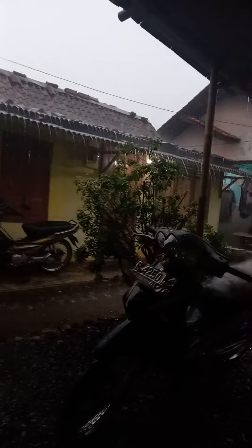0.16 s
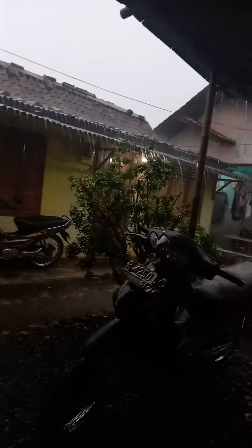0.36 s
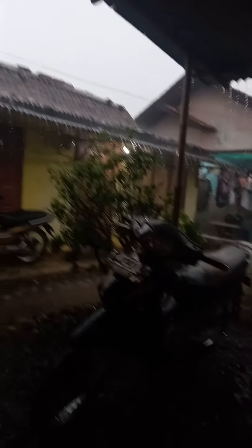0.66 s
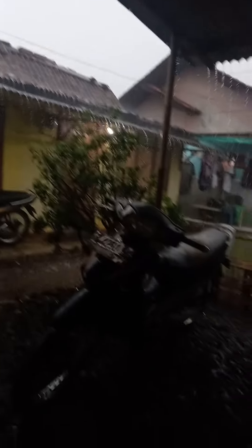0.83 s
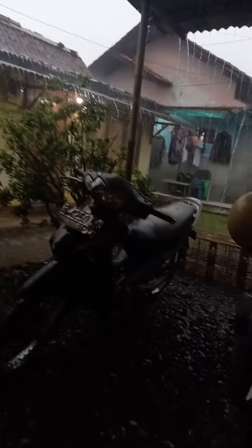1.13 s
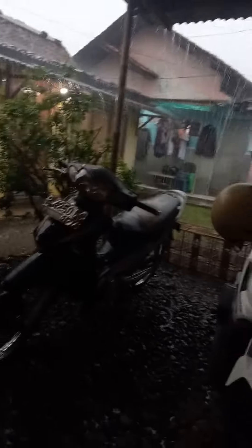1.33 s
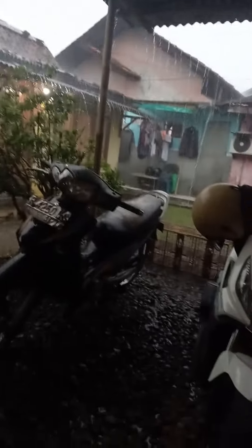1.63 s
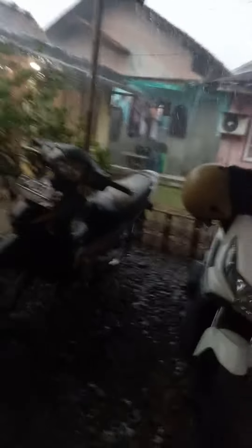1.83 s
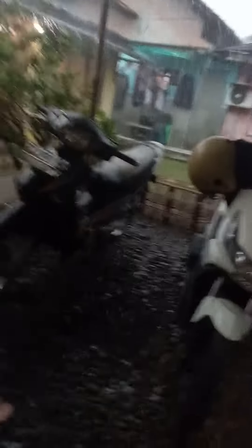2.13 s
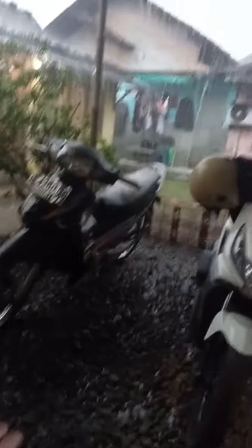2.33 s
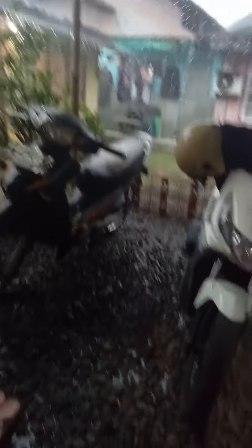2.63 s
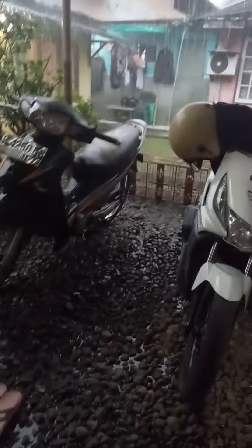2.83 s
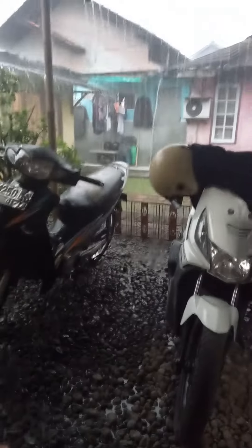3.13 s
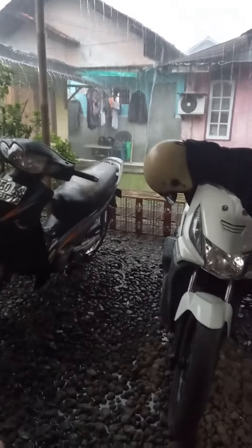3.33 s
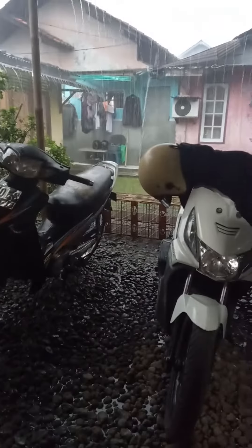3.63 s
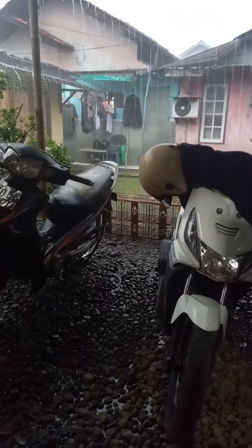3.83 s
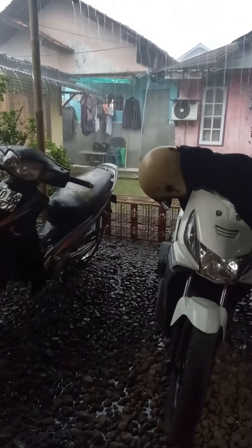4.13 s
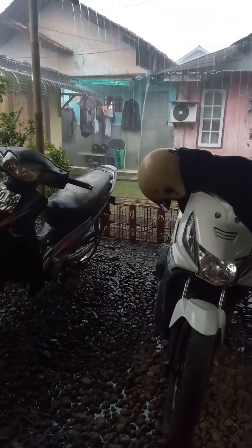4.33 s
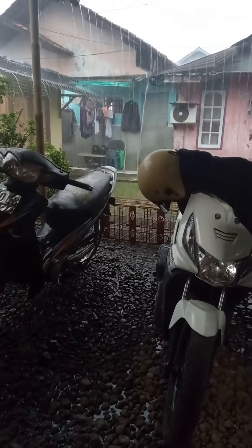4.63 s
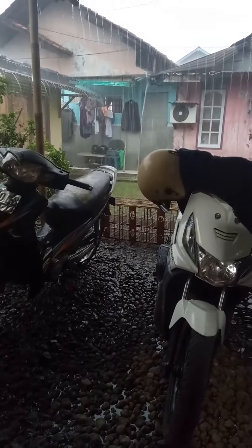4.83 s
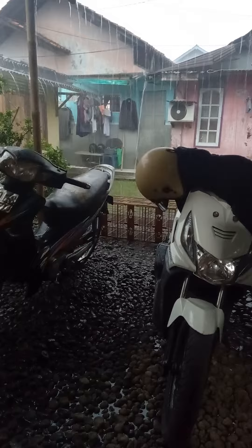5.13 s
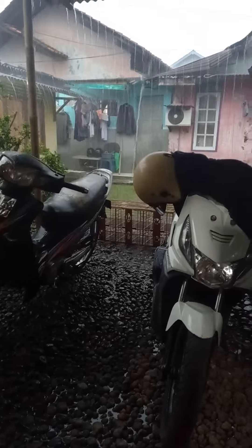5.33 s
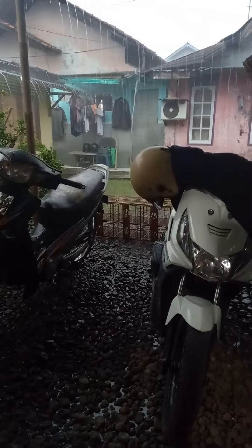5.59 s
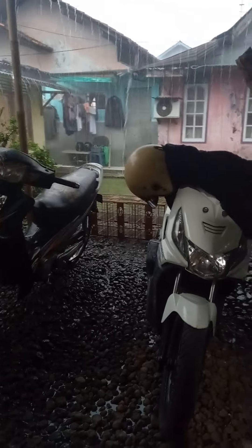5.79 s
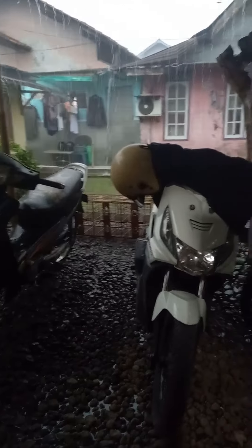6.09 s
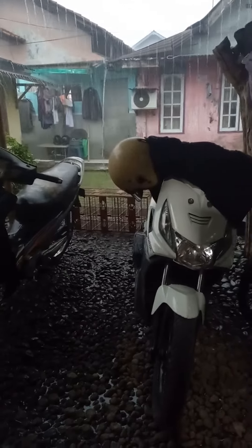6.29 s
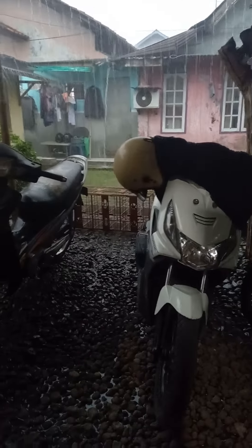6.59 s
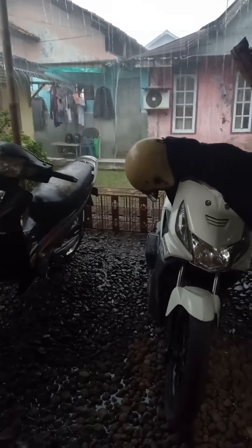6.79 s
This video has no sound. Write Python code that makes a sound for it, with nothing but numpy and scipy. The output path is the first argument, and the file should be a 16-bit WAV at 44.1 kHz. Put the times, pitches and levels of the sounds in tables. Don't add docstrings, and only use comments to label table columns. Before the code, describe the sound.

Heavy rain roars on a gravel yard and drums on a metal roof; distant thunder mutters, then a near strike cracks and rolls on.

```python
import sys
import numpy as np
from scipy import signal
from scipy.fft import rfft, irfft, next_fast_len
from scipy.io import wavfile
from scipy.ndimage import uniform_filter1d, minimum_filter1d, map_coordinates

SR = 44100
rng = np.random.default_rng(int(sys.argv[2]) if len(sys.argv) > 2 else 0)


def level_to_linear(level):
    exponent = np.asarray(level, float) / 20
    return 10 ** exponent


def file_out(sig):
    cols = np.atleast_2d(sig).T
    lim = np.clip(cols, -1, 1)
    pcm = np.round(lim * 32767).astype(np.int16)
    wavfile.write(sys.argv[1], SR, pcm)


N = 306495


def unit(x):
    return x / np.sqrt(np.mean(x ** 2) + 1e-20)


def along(points, hz):
    f, v = np.transpose(points)
    return np.interp(np.log(hz + 1), np.log(f + 1), v)


def curves(rows):
    s, *cols = np.transpose(rows)
    return [np.interp(np.arange(N) / SR, s, c) for c in cols]


def wobble(rate):
    knots = rng.standard_normal(int(N * rate / SR) + 4)
    return map_coordinates(knots, [np.arange(N) * rate / SR])


def filtered(x, response):
    m = next_fast_len(N + 8192)
    return irfft(rfft(x, m) * response(np.fft.rfftfreq(m, 1 / SR)), m)[..., :N]


# frequency in Hz, likeness from 0 to 1.
RAIN_LIKENESS = [(60, 0.94), (200, 0.96), (350, .8), (550, 0.57), (750, 0.35), (1000, 0.078), (1400, 0.31),
                 (1750, 0.84), (2000, 0.064), (4000, 0.04), (8000, .02)]
# frequency in Hz, lead of the left in radians.
LEFT_LEAD = [(200, 0), (430, 0.63), (800, 1.3), (1400, 3), (1900, 5), (2500, 7.5), (3500, 10.5),
             (5000, 12.5), (7000, 21)]
# frequency in Hz, left minus right in dB.
LEFT_OVER_RIGHT = [(60, -1.5), (110, -1.0), (200, -0.5), (380, -3), (700, -0.5), (1290, -0.5), (2380, -1.0),
                   (4400, -0.5), (8120, 1.5), (15000, 0.5)]


def ports(pair, spectrum, alike):
    m = next_fast_len(N + 8192)
    hz = np.fft.rfftfreq(m, 1 / SR)
    left, other = rfft(pair, m)
    like = np.clip(along(alike, hz), 0, .999)
    right = like * np.exp(-1j * along(LEFT_LEAD, hz)) * left + np.sqrt(1 - like ** 2) * other
    level_db = along(spectrum, hz) + along(LEFT_OVER_RIGHT, hz) * [[.5], [-.5]]
    both = irfft(level_to_linear(level_db) * [left, right], m)[:, :N]
    return both / np.sqrt(np.mean(both.mean(0) ** 2))


def drops(per_s, spread_db, far, patchy_db):
    luck = rng.random((3, 2, N))
    size = level_to_linear(-spread_db * np.log(luck[1] + 0.0087)) * np.sign(luck[2] - .5)
    near = unit(size * (luck[0] < per_s / SR))
    mix = np.sqrt(1 - far) * near + np.sqrt(far) * rng.standard_normal((2, N))
    z = signal.stft(mix, nperseg=512)[2]
    field = uniform_filter1d(rng.standard_normal(z.shape[1:]), size=12, axis=0)
    field = uniform_filter1d(field, size=6, axis=1)
    return signal.istft(z * level_to_linear(patchy_db * unit(field)), nperseg=512)[1][:, :N]


# frequency in Hz, level in dB per Hz.
YARD_COLOUR = [(250, -29), (450, -11.5), (750, 0), (1200, -2), (1650, -1.5), (2100, -5), (2800, -10),
               (3400, -18), (5000, -39)]
# time in seconds, treble gain in dB.
FACING_RUNOFF = [(0, 3), (.5, 0.5), (1.2, -1.5), (3, -0.1), (4.5, -0.3), (6.95, 0.8)]


def yard(sheets):
    impacts = drops(per_s=3000, spread_db=1.5, far=0.82, patchy_db=0.3)
    over_splashes_db = 4
    roar = level_to_linear(over_splashes_db - 0.52 + 0.8 * sheets) * ports(impacts, YARD_COLOUR, RAIN_LIKENESS)
    treble = filtered(roar, lambda hz: 1 / (1 + (2300 / (hz + 1)) ** 4))
    return roar + (level_to_linear(curves(FACING_RUNOFF)[0]) - 1) * treble


# frequency in Hz, level in dB per Hz.
ROOF_COLOUR = [(40, -40), (90, -1.5), (200, -0.5), (400, 1), (600, -0.5), (900, -18), (1500, -41)]
# time in seconds, roof over splashes in dB.
UNDER_EAVES = [(0, -3), (1.5, -1.4), (3.1, 0.2), (3.6, 2), (4.3, 0), (5.1, -.5), (6.95, 0)]


def roof():
    impacts = drops(per_s=2500, spread_db=0, far=0.8, patchy_db=-0.13)
    return level_to_linear(curves(UNDER_EAVES)[0] + 1.5) * ports(impacts, ROOF_COLOUR, RAIN_LIKENESS)


# frequency in Hz, level in dB per Hz.
SPLASH_COLOUR = [(1500, -45), (2600, -3.5), (3300, -0.5), (4200, -1.5), (5000, -2.5), (6000, 0), (6600, 1),
                 (7800, 2), (8100, -64)]


def splashes(sheets):
    impacts = drops(per_s=5000, spread_db=1.5, far=0.5, patchy_db=0.53)
    return level_to_linear(-0.18 + 1.17 * sheets) * ports(impacts, SPLASH_COLOUR, RAIN_LIKENESS)


# frequency in Hz, level in dB per Hz.
MIST_COLOUR = [(7900, -60), (8200, 2.5), (16000, -2.5)]


def mist(sheets):
    impacts = drops(per_s=5000, spread_db=4.0, far=0.71, patchy_db=2.0)
    return level_to_linear(4 + 0.84 * sheets) * ports(impacts, MIST_COLOUR, RAIN_LIKENESS)


# time in seconds, rain level in dB.
RAIN_GAIN = [(0, -23.5), (.4, -23.5), (1.2, -23), (1.7, -23.5), (2.05, -23), (2.5, -23.5), (3.17, -23.2),
             (3.33, -25.5), (3.44, -26.8), (3.5, -29.5), (3.62, -26.5), (4.3, -26.5), (5.05, -26),
             (5.2, -25), (5.45, -24), (5.75, -25), (6.3, -25), (6.95, -24.2)]


def rain():
    sheets = 0.26 * wobble(14) + 0.32 * wobble(40) + .5 * wobble(110)
    return level_to_linear(curves(RAIN_GAIN)[0]) * (yard(sheets) + roof() + splashes(sheets) + mist(sheets))


# time in seconds, peak in dB, ringing in Hz.
CLAP_FRONTS = [(3.213, -4, 160), (3.278, -6, 88.8), (3.323, -5, 131), (3.398, 1, 86), (3.449, -5, 105),
               (3.52, -6, 150), (3.611, -1, 95), (3.739, -5, 98), (4.52, -6, 108), (5.26, -11, 88.8),
               (5.689, -4, 99.6), (5.785, -7, 88.8), (6.189, -4, 102)]


def claps():
    out = np.zeros(N + SR)
    t = np.arange(SR // 8) / SR
    fade_s, push_s = 0.083, 0.0024
    for s, db, hz in CLAP_FRONTS:
        envelope = level_to_linear(db - 4 - 60 * t / fade_s) * (1 - np.exp(-t / push_s))
        out[round(s * SR):][:len(t)] += envelope * np.sin(2 * np.pi * hz * t)
    return filtered(out[:N], lambda hz: (1j * hz / (1j * hz + 48)) ** 4) * level_to_linear([[-.4], [.4]])


# start in seconds, hold in seconds, level in dB, pitch in Hz.
NEAR_PEALS = [(3.212, .05, -16.5, 160), (3.27, .04, -14, 82), (3.31, 0.12, -12.5, 147),
              (3.385, 0.077, -12.5, 76), (3.44, 0.044, -14, 98), (3.47, 0.116, -14, 160),
              (3.613, 0.063, -11.5, 95), (3.728, .1, -16, 96), (3.68, .2, -20.5, 165),
              (3.9, 0.037, -16, 106), (4.107, 0.081, -22, 150), (4.19, .04, -24, 88),
              (4.393, 0.054, -14, 106), (4.52, 0.044, -15, 108), (4.6, 0.036, -19, 108),
              (4.79, 0.097, -22, 100), (4.966, .06, -26, 90), (5.08, .14, -22, 88), (5.25, 0.082, -19, 100),
              (5.17, .16, -23, 170), (5.56, .04, -20, 78), (5.692, 0.036, -12.5, 92),
              (5.786, 0.041, -15, 98), (5.85, 0.089, -18, 110), (6.02, 0.032, -21, 140),
              (6.138, 0.13, -14.5, 95), (6.3, 0.054, -17, 100), (6.65, 0.087, -19, 97),
              (6.77, 0.03, -17.5, 98), (6.873, 0.027, -24, 80.5)]
# start in seconds, hold in seconds, level in dB, pitch in Hz.
FAR_PEALS = [(0.086, .04, -31, 95), (.12, 0.091, -26, 144), (.3, .03, -32, 78), (.6, 0.097, -24.5, 95),
             (0.722, .03, -29, 140), (.93, .05, -29, 110), (1.03, .06, -33, 82), (1.266, 0.12, -27.5, 88),
             (1.404, 0.092, -22, 145), (1.54, 0.13, -28, 90), (1.79, .04, -33, 120),
             (1.99, 0.043, -20, 115), (2.08, 0.11, -25, 98), (2.39, .06, -26, 98), (2.54, 0.12, -24.5, 85),
             (2.736, .04, -26, 110), (2.826, 0.036, -20.5, 150), (2.899, 0.046, -18.5, 98),
             (2.97, .04, -23, 74), (3.13, .06, -21, 78)]
# time in seconds, level in dB, extra depth in dB.
STORM_ROLL = [(0, -39, -3), (.6, -33, 1), (1.3, -35, 0), (1.8, -33.5, 7), (2.3, -31.5, 0), (2.75, -31, 8),
              (3.185, -35, 2), (3.215, -20, 2), (3.85, -21, 1), (4, -23.5, -3), (4.3, -23.5, 4),
              (4.5, -23.5, -13), (5.1, -23, 8), (5.5, -23.5, -2), (6.1, -22.5, 1), (6.4, -26, -4),
              (6.8, -31, 3), (6.95, -37, 0)]


def swells(colour_hz, roll_db, deep_share):
    rise_s, fade_s = 0.02, .05
    off_pitch_db = 84
    t = np.arange(0, N, 64) / SR
    s, hold, db, hz = np.transpose(FAR_PEALS + NEAR_PEALS)[..., None]
    shape_db = -20 * (np.maximum(s - t, 0) / rise_s + np.maximum(t - s - hold, 0) / fade_s)
    peals = level_to_linear(db + shape_db - off_pitch_db * np.log2(hz / colour_hz) ** 2)
    peal_power = np.interp(np.arange(N) / SR, t, (peals ** 2).sum(0))
    level_db, depth_db = curves(STORM_ROLL)
    roll = level_to_linear(level_db + roll_db + deep_share * depth_db)
    return np.sqrt(roll ** 2 + peal_power)


def peal(spectrum, per_s, even, span_s):
    pulses = rng.standard_normal((2, N)) * (rng.random((2, N)) < per_s / SR)
    wave = ports(pulses, spectrum, [(40, 0.86), (90, 1.0), (300, 0.98)])
    strength = np.abs(uniform_filter1d(wave.mean(0) ** 2, int(span_s * SR))) + .02
    return unit(wave / strength ** (even / 2))


# frequency in Hz, level in dB per Hz.
DEEP_COLOUR = [(25, -47), (45, -34), (62, -9), (78, 4.5), (90, -0.5), (105, -41), (150, -42)]
# frequency in Hz, level in dB per Hz.
BOOM_COLOUR = [(55, -48), (80, -10), (93, 3.5), (110, -4), (125, -10), (145, -20.5), (200, -46)]
# frequency in Hz, level in dB per Hz.
RUMBLE_COLOUR = [(80, -30), (120, -8), (145, 4.5), (175, -2.5), (230, -7), (300, -12.5), (380, -13.5),
                 (600, -41)]


def thunder():
    deep = level_to_linear(-3.5) * peal(DEEP_COLOUR, per_s=600, even=0.93, span_s=0.046)
    deep = deep * swells(colour_hz=78, roll_db=-6, deep_share=1)
    boom = level_to_linear(-0.8) * peal(BOOM_COLOUR, per_s=800, even=0.89, span_s=0.039)
    boom = boom * swells(colour_hz=98, roll_db=0.5, deep_share=-.1)
    rumble = level_to_linear(-1.0) * peal(RUMBLE_COLOUR, per_s=900, even=0.48, span_s=0.031)
    rumble = rumble * swells(colour_hz=155, roll_db=-0.05, deep_share=-.05)
    return deep + boom + rumble + claps()


def scene():
    return rain() + filtered(thunder(), lambda hz: 1 / np.sqrt(1 + (52 / (hz + 1)) ** 8))


def top_cut(x):
    return signal.sosfilt(signal.butter(12, 15900, fs=SR, output="sos"), x)


# frequency in Hz, gain in dB.
PHONE_RESPONSE = [(6650, 1), (7100, -11.5), (7450, -20.5), (7750, -36), (8050, -68), (8400, -21.5),
                  (9000, -25), (10500, -22), (12300, -18), (13850, -19.5), (14550, -9.5), (15740, -6.5),
                  (15820, -90)]


def record(dry):
    notch_hz, width_hz, depth = 1806, 45, 0.51

    def response(hz):
        notch = 1 - depth / (1 + ((hz - notch_hz) / width_hz) ** 2)
        return level_to_linear(along(PHONE_RESPONSE, hz)) * notch

    x = filtered(dry, response)
    need = np.minimum(1, .93 / (np.abs(x).max(0) + 1e-9))
    gain = uniform_filter1d(minimum_filter1d(need, size=601), size=301)
    return top_cut(x * gain)


dry = scene()
out = record(dry)
file_out(out)
```